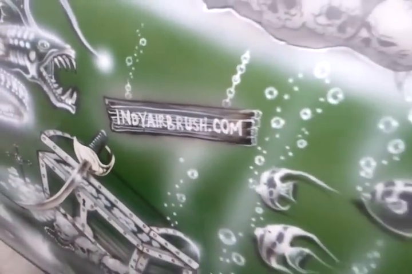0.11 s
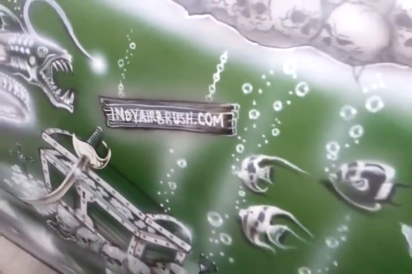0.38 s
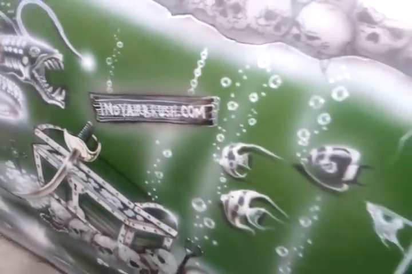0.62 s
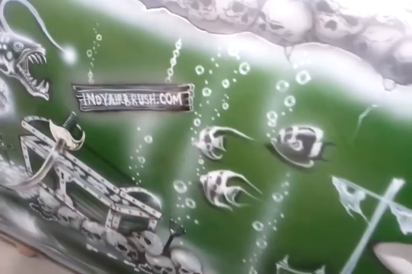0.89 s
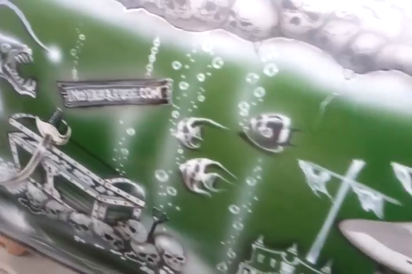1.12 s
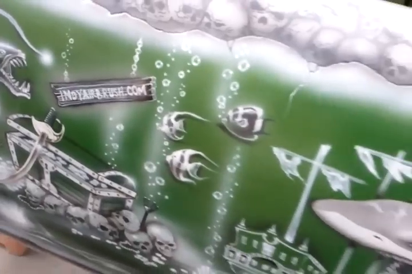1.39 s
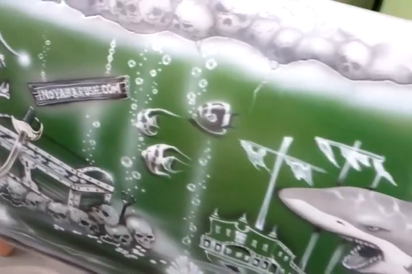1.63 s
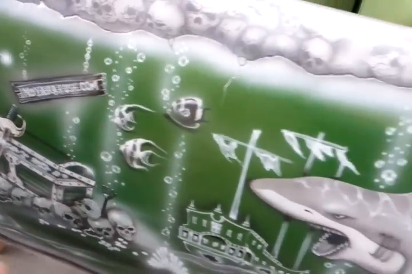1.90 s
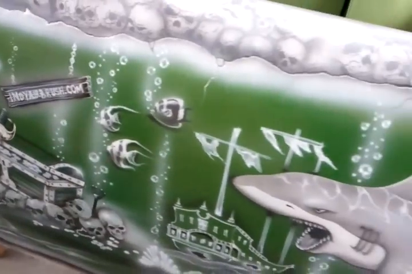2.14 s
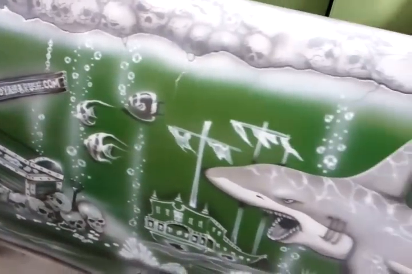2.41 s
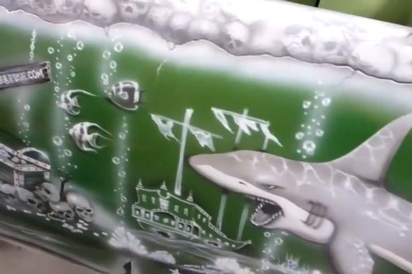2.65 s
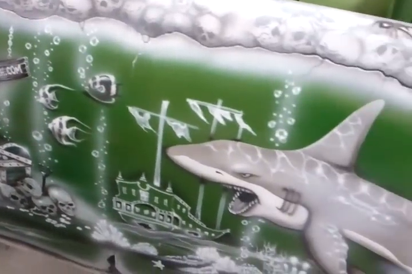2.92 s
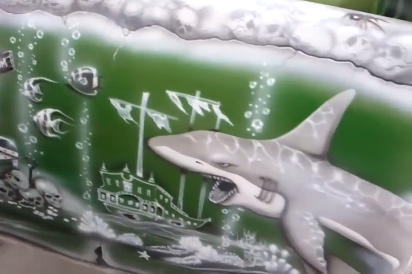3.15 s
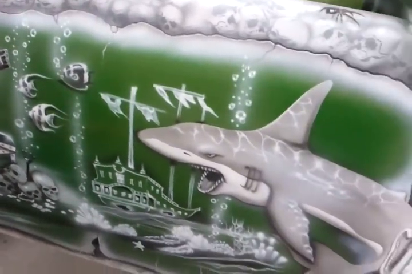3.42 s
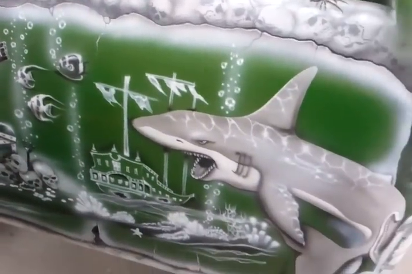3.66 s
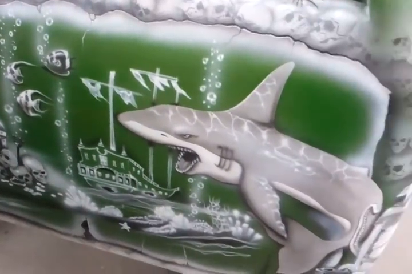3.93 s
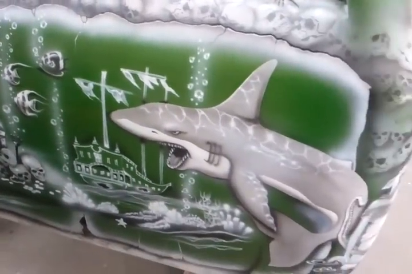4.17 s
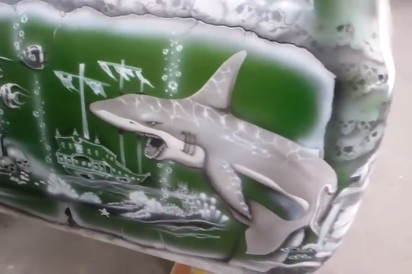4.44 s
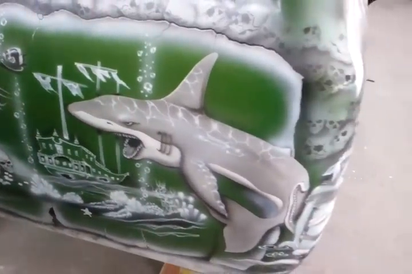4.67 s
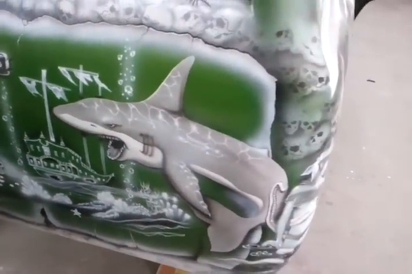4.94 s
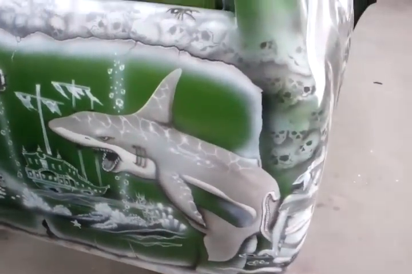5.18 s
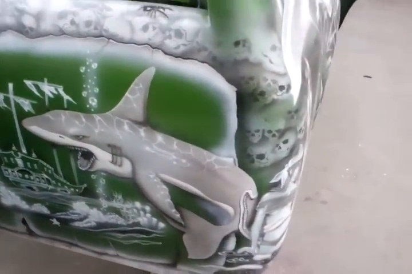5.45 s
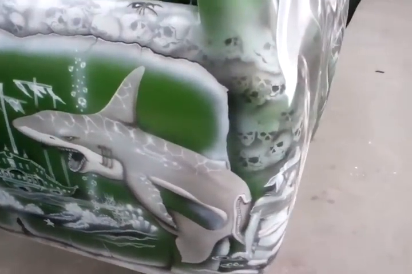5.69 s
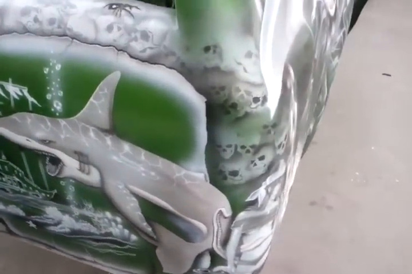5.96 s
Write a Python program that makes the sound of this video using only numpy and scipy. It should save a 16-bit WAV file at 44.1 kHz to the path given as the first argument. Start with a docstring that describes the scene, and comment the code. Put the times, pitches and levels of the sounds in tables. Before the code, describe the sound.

A constant bright air-leak hiss with a sizzling top, over faint room rumble, and three far-off hollow knocks echoing, two near the end.

```python
"""Air leak in a hard-walled workshop

Compressed air hisses from a leaking hose while a small camera pans past: broad noise plus a sizzle band.
Far off, something hollow is knocked three times, the last time hard: ringing modes smeared by the walls.
A soft murmur and steady low noise, both shaped noise, lie behind. The camera samples at a low rate, which
mirrors some treble, and carries a constant offset."""
import sys
import numpy as np
from scipy import signal
from scipy.fft import rfft, irfft, next_fast_len
from scipy.io import wavfile
from scipy.ndimage import uniform_filter1d, map_coordinates

SR = 44100
rng = np.random.default_rng(int(sys.argv[2]) if len(sys.argv) > 2 else 0)


def store_wav(level_fs):
    """Save 16-bit WAV to argv[1]."""
    pcm = np.round(np.clip(np.atleast_2d(level_fs), -1, 1) * 32767)
    wavfile.write(sys.argv[1], SR, pcm.T.astype(np.int16))


def elevation(decibels):
    """Turn decibel levels (scalar or array-like) into linear amplitude ratios."""
    levels = np.asarray(decibels, float)
    return 10 ** (levels / 20)


N = 268128  # length in samples
SAMPLE_HZ = 16000  # the camera's own sampling rate

# The jet as heard at the camera: t/s, level/dB, turn towards the nozzle as sizzle gain/dB
JET_AT_CAMERA = [(0.05, -29.5, 0.5), (0.22, -30, 0.5), (0.78, -29.5, 1), (1.85, -32, 0.5), (2.7, -31, -0.5),
                 (5.06, -32.5, 0), (5.61, -35.5, -0.5), (5.98, -31.5, 0), (6.03, -32, 0.5)]


def unit(x):
    """Bring to rms 1."""
    return x / np.sqrt(np.mean(x ** 2) + 1e-20)


def along(points, hz):
    """Read (Hz, value) points on a log frequency axis."""
    f, v = np.transpose(points)
    return np.interp(np.log(hz + 1), np.log(f + 1), v)


def curves(rows):
    """Give one value per sample for each column after the time."""
    s, *columns = np.transpose(rows)
    return [np.interp(np.arange(N) / SR, s, column) for column in columns]


def wobble(rate):
    """Draw a smooth random curve with rate knots a second."""
    knots = rng.standard_normal(N // 100)
    return map_coordinates(knots, [np.arange(N) * rate / SR])


def filtered(x, response):
    """Multiply the spectrum of x by a response of frequency."""
    m = next_fast_len(N + SR // 2)
    spectrum = rfft(x, m) * response(np.fft.rfftfreq(m, 1 / SR))
    return irfft(spectrum, m)[..., :N]


def patches(shape, wide, long):
    """Draw a random field of rms 1, smoothed over wide bins and long frames."""
    across_bins = uniform_filter1d(rng.standard_normal(shape), wide, axis=0)
    return unit(uniform_filter1d(across_bins, long, axis=1))


def rush(shape_db, patchy_db, standing_db):
    """Colour noise of rms 1 by shape_db(Hz, s); eddies make broad patches, standing waves narrow streaks."""
    hz, s, z = signal.stft(rng.standard_normal(N), SR, nperseg=1024, noverlap=768)
    eddies = patchy_db * patches(z.shape, 12, 14)
    streaks = standing_db * patches(z.shape, 2, 30)
    z = z * elevation(shape_db(hz[:, None], s) + eddies + streaks)
    noise = signal.istft(z, SR, nperseg=1024, noverlap=768)[1]
    return unit(noise[:N])


def shop_air():
    """A soft, lumpy murmur, partly fed by the jet, fills the room over steady low noise."""
    # Colour of the shop air's murmur: f/Hz, level/dB per Hz
    murmur_colour = [(60, -32), (140, -8), (220, -7), (400, -5), (1000, -6.5), (2200, -8), (5000, -25.5)]
    # Steady low noise with a narrow line near 40 Hz: f/Hz, level/dB per Hz
    low_colour = [(15, -3), (30, -5), (40, 2.5), (48, -8), (65, -9), (80, -6), (120, -8), (200, -11),
                  (400, -38.5)]
    air_db, drift_db = -48, 0.32  # murmur level and its slow drift
    follow = 0.4  # dB the murmur moves for each dB of the jet
    jet_db = curves(JET_AT_CAMERA)[0]
    level_db = air_db + follow * (jet_db - jet_db.mean()) + drift_db * wobble(0.79)
    level_db = level_db + 0.24 * wobble(4.7)
    murmur = rush(lambda hz, s: along(murmur_colour, hz), patchy_db=1.0, standing_db=2.5)
    low_noise = unit(filtered(rng.standard_normal(N), lambda hz: elevation(along(low_colour, hz))))
    return elevation(level_db) * murmur + elevation(-52.5) * low_noise


def shop(x, near_db, far_db):
    """Near walls answer densely and stop soon; the far hall lingers, longest in the low mids."""
    # Workshop reverberation: f/Hz, time to fall by 60 dB/s
    shop_t60 = [(150, 1), (400, 1.3), (1000, 1), (3000, .6)]
    hz, t, z = signal.stft(rng.standard_normal(SR), SR, nperseg=256)
    near = elevation(near_db - 60 * (t / 0.17) ** 2)
    far = elevation(far_db - 60 * t / along(shop_t60, hz)[:, None])
    tail = signal.istft(z * (near + far), SR, nperseg=256)[1]  # a new tail at each call
    return signal.fftconvolve(x, tail)[:N]


def hollow_body(f, bright_db, boom_db):
    """Resonances of the hollow thing, its high and low modes weighted by where the blow lands."""
    # What the knocked thing rings with: f/Hz, width/Hz, level/dB
    hollow_modes = [(213.5, 12, -3.5), (272, 8.1, -6.5), (315, 11, -4), (422.6, 15, -1), (613, 64, -7.5),
                    (834, 110, -6.5), (1160, 350, -11), (1600, 360, -8.5), (2000, 420, -9),
                    (3000, 990, -15.5)]
    total = 0
    for k, (centre, width, db) in enumerate(hollow_modes):
        gain = elevation(db + bright_db * (centre > 1500) + boom_db * (centre < 500))
        mode = 1j * f * width / (centre * centre - f * f + 1j * f * width)
        total = total + (-1) ** k * gain * mode  # neighbouring modes have opposite signs
    return total


def knocks():
    """Each blow is an impulse that rings the hollow body; far away the room outweighs the direct sound."""
    # Far knocks: t/s, blow strength/dB, brightness/dB, boom/dB
    far_blows = [(2.185, -4.5, -1.5, -6.5), (5.403, -3.5, -5.5, -1), (5.685, 2.5, -2, 2)]
    total = np.zeros(N)
    for s, db, bright_db, boom_db in far_blows:
        blow = np.zeros(N)
        blow[round(s * SR)] = elevation(db)
        ring = filtered(blow, lambda f: hollow_body(f, bright_db, boom_db))
        total += elevation(6) * ring + shop(ring, near_db=-23.5, far_db=-21.5)
    return total


def jet():
    """Broad turbulence plus a sizzle band; both drift as the pan changes the angle to the nozzle."""
    # Broad turbulent hiss: f/Hz, level/dB per Hz
    hiss_colour = [(300, -38), (900, -14), (2200, -9.5), (3200, -4.5), (4800, 0), (6200, 1), (8000, -5.5)]
    hiss_base_db, sizzle_base_db = -1, -4.5  # the two parts relative to the jet's level
    start_hz, sag_hz, sag_power = 7420, 450, 3.1  # sizzle centre, its fall over the pan, lateness of the fall
    tilt_db, tilt_gain_db = -0.75, 1.7  # hiss tilt per octave at first, its rise over the pan
    hiss_yields = 0.4  # dB the broad hiss loses for each dB the sizzle gains by facing
    level_db, facing_db = curves(JET_AT_CAMERA)
    flow = wobble(4)

    def pan(s):
        return np.clip(s * SR / N, 0, 1)

    def colour(hz, s):
        octaves = np.log2(np.clip(hz, 1500, 8000) / 4500)
        return along(hiss_colour, hz) + (tilt_db + tilt_gain_db * pan(s)) * octaves

    def band(hz, s):
        centre = start_hz - sag_hz * pan(s) ** sag_power
        return -20 * np.log10(1 + ((hz - centre) / 800) ** 2) - 90 * (hz > SAMPLE_HZ / 2)

    hiss = rush(colour, patchy_db=0.05, standing_db=2.0)
    sizzle = rush(band, patchy_db=-0.1, standing_db=0.6)
    hiss_db = hiss_base_db - hiss_yields * facing_db + 0.25 * flow
    flicker_db = 0.53 * wobble(8) + 0.23 * wobble(40)
    sizzle_db = sizzle_base_db + facing_db + 0.41 * flow + flicker_db
    return elevation(level_db) * (elevation(hiss_db) * hiss + elevation(sizzle_db) * sizzle)


def scene():
    """Room murmur, far knocks and the jet meet at one microphone."""
    return (shop_air() + knocks() + jet())[None]


def band_limit(x):
    """A steep low-pass at the top of the band."""
    return signal.sosfilt(signal.butter(12, 9290, fs=SR, output="sos"), x)


def record(dry):
    """Low-rate sampling mirrors the treble about half the rate; a soft filter lets part of the mirror through."""
    # Filter that smooths the camera's samples: f/Hz, gain/dB
    smoothing = [(7200, 0.5), (7600, 2.5), (8000, 3), (8300, -6.5), (8600, -16.5), (8900, -30.5),
                 (9150, -75), (9400, -120)]
    offset = -0.1062  # constant, full scale = 1
    kept = filtered(dry, lambda hz: hz < SAMPLE_HZ / 2)
    mirror = 2 * kept * np.cos(2 * np.pi * SAMPLE_HZ * np.arange(N) / SR)
    smooth = filtered(kept + mirror, lambda hz: elevation(along(smoothing, hz)))
    return band_limit(smooth + offset)


dry = scene()
out = record(dry)
store_wav(out)
```